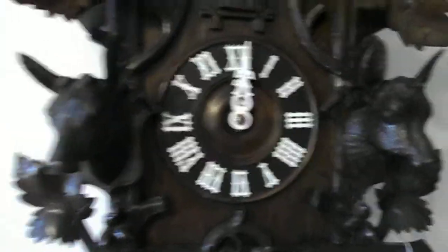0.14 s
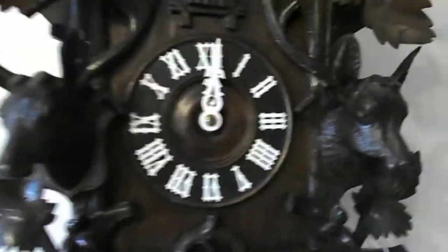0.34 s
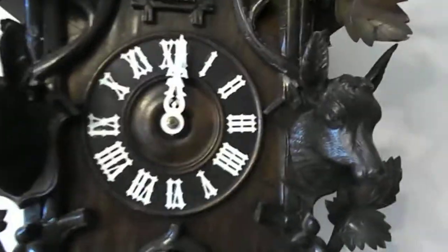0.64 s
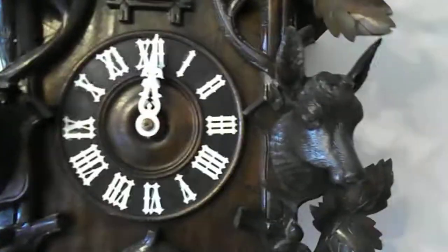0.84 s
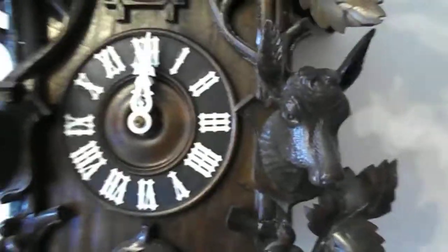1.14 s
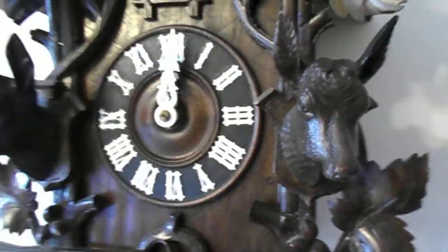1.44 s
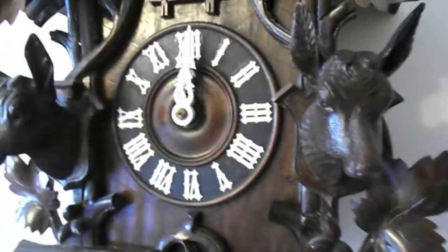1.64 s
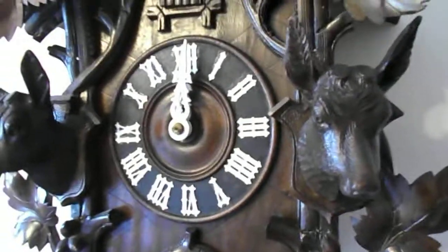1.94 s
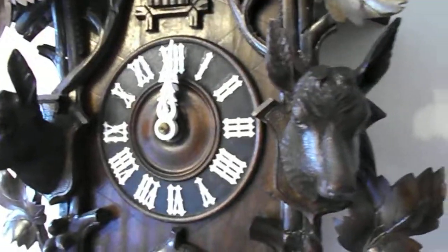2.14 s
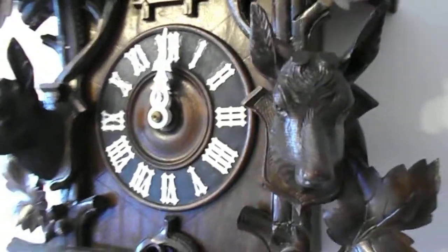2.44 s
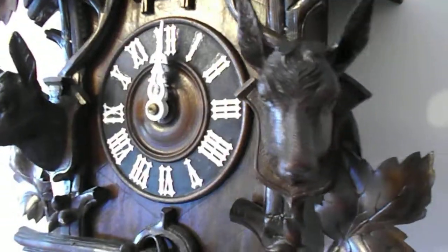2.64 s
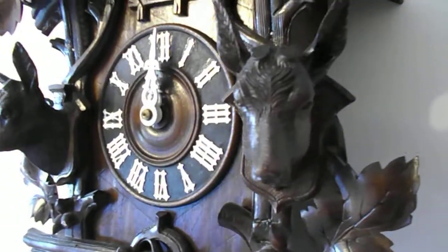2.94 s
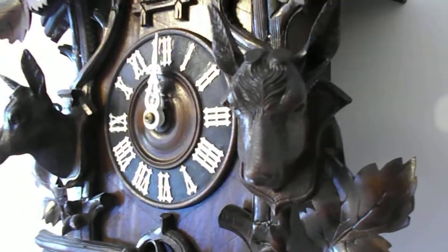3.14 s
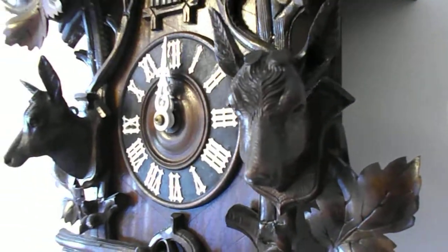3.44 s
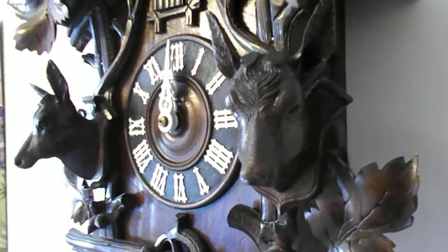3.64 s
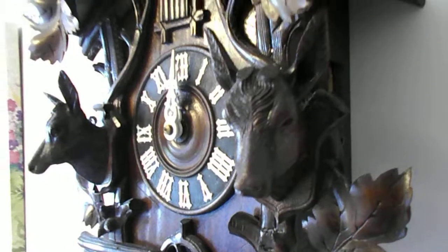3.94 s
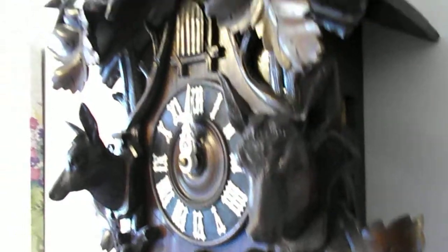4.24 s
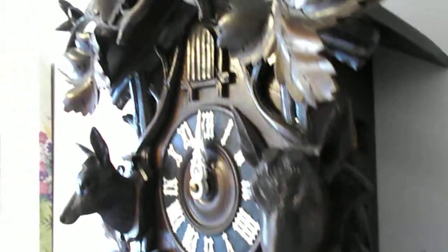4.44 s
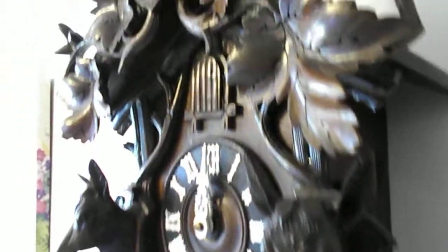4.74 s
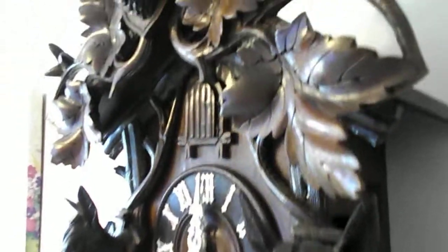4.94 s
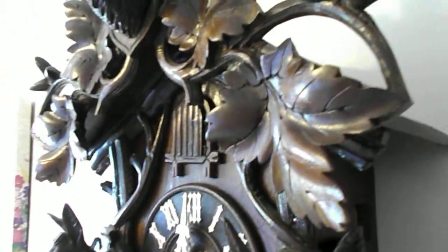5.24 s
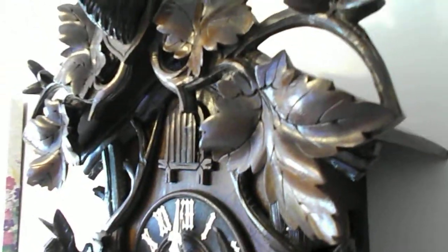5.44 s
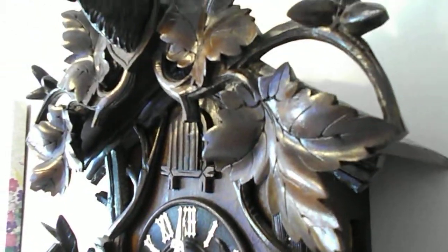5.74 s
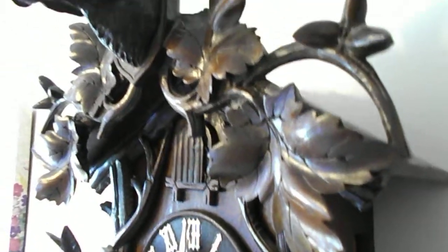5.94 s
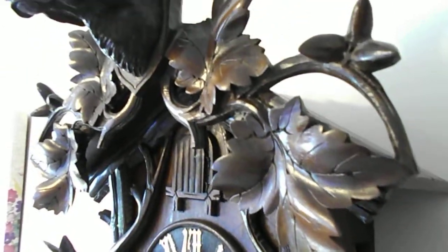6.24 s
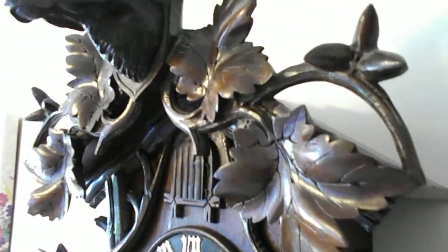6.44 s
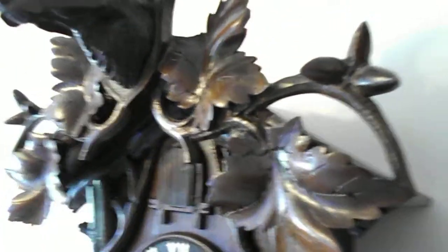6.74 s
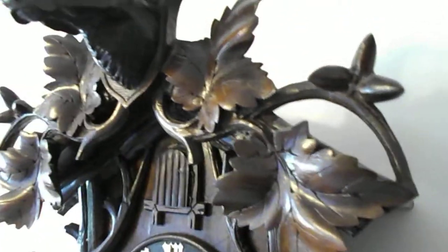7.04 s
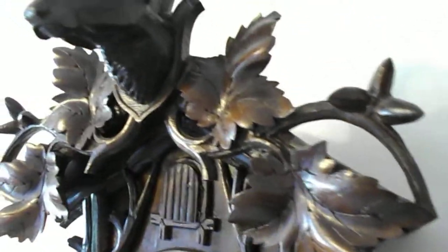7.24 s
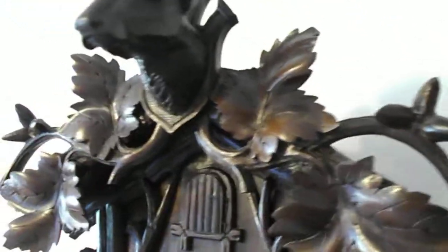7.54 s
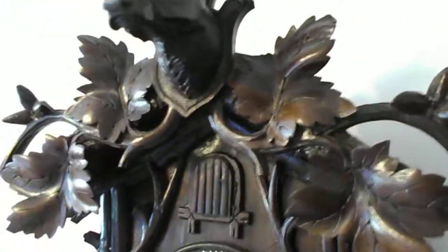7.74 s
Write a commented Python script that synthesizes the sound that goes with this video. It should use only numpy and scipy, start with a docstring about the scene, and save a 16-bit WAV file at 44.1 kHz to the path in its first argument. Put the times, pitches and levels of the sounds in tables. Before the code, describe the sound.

An old wooden wall clock ticks steadily, tick and tock alternating, while a hand-held microphone rustles, creaks and clicks in a quiet room.

```python
"""Wall clock in a small room

A carved wooden wall clock ticks in a small quiet room, heard by a hand-held microphone that moves round it.
The escape wheel strikes two pallets in turn: clusters of impulses ring the damped modes of the case,
and small knocks follow some of the ticks. Shaped noise gives room hum, shuffling clothes and a thin hiss.
The grip creaks, drags and clicks, a faint tone swells once, a hollow tap sounds; a filter dulls the treble.
"""
import sys
import numpy as np
from scipy import signal
from scipy.fft import rfft, irfft
from scipy.io import wavfile

SR = 44100
rng = np.random.default_rng(int(sys.argv[2]) if len(sys.argv) > 2 else 0)


def undo_db(level):
    """Turn decibels back into plain size, where 20 dB means ten times bigger."""
    steps = np.asarray(level, float) / 20
    return 10 ** steps


def wav_record(signal):
    """Record a signal, one row per channel, as 16-bit PCM in the file named by sys.argv[1]."""
    frames = np.transpose(np.atleast_2d(signal))
    bounded = np.clip(frames, -1, 1)
    # unit amplitude maps onto the largest positive 16-bit level
    quanta = np.round(bounded * 32767).astype(np.int16)
    wavfile.write(sys.argv[1], SR, quanta)


N = 347067   # length [samples]


def butter(order, hz, kind, x):
    """Butterworth filtering: a maximally flat pass band."""
    return signal.sosfilt(signal.butter(order, hz, kind, fs=SR, output="sos"), x)


def at_hz(points, hz):
    """Logarithmic frequency scale: read a (frequency [Hz], value) table along it."""
    table_hz, values = np.array(points).T
    return np.interp(np.log(np.maximum(hz, 1)), np.log(table_hz), values)


def coloured(spectrum):
    """Spectral shaping: white noise weighted by a (frequency [Hz], level [dB]) table."""
    gain = undo_db(at_hz(spectrum, np.fft.rfftfreq(N, 1 / SR)))
    return irfft(rfft(rng.standard_normal(N)) * gain, N)


def unit_band(x, low_hz, high_hz):
    """Band level: scale x to an rms of 1 between two frequencies."""
    return x / np.std(butter(4, [low_hz, high_hz], "band", x))


def waver(per_s):
    """Slow random modulation: straight lines between normal draws of spread 1."""
    steps = rng.standard_normal(1000)
    return np.interp(np.arange(N) / SR * per_s, np.arange(len(steps)), steps)


PATCHY_DB, PATCHES_PER_S = 1.5, 25   # spread and rate of the flicker


def patchy(x):
    """Independent band modulation: cloth is uneven, so four bands flicker apart."""
    spectrum = rfft(x)
    band = np.searchsorted([900, 1800, 3600], np.fft.rfftfreq(N, 1 / SR))
    return sum(undo_db(PATCHY_DB * waver(PATCHES_PER_S)) * irfft(spectrum * (band == k), N) for k in range(4))


FILTER_START_HZ = 4740
# zeros of the treble response [Hz]
FILTER_NULLS_HZ = [6990, 8510, 9995, 12000]
# height of the lobes between neighbouring zeros, before the top falls [dB]
FILTER_LOBES_DB = [-24, -20.5, -13.5]
TOP_FALL_HZ, TOP_FALL_DB_PER_KHZ = 10950, 17


def treble_filter(x):
    """Short symmetric low-pass: a slope down to the first null, then small lobes of alternating sign."""
    hz = np.fft.rfftfreq(N, 1 / SR)
    first_null = FILTER_NULLS_HZ[0]
    slope = np.clip((first_null - hz) / (first_null - FILTER_START_HZ), 0, 1)
    gain = np.sin(np.pi / 2 * slope) ** 1.59
    for k, (low, high, db) in enumerate(zip(FILTER_NULLS_HZ, FILTER_NULLS_HZ[1:], FILTER_LOBES_DB)):
        lobe = np.sin(np.pi * np.clip((hz - low) / (high - low), 0, 1))
        gain -= (-1) ** k * undo_db(db) * lobe
    gain *= undo_db(-TOP_FALL_DB_PER_KHZ * np.maximum(hz - TOP_FALL_HZ, 0) / 1000)
    return irfft(rfft(x) * gain, N)


# slow background level, high while the holder moves about:
# (time [s], hum level [dB], shuffle level [dB], thin hiss level [dB])
BACKGROUND = [(0.0, -63, -61, -78.5), (0.2, -62.5, -63.5, -80), (0.45, -53, -55, -71), (0.7, -62, -56, -76),
              (1.0, -63.5, -62, -78.5), (1.6, -65, -62.5, -78), (2.3, -64, -63.5, -79.5),
              (2.8, -63, -65.5, -84), (3.2, -68.5, -69.5, -84), (4.0, -63.5, -65, -86),
              (4.7, -67.5, -68, -86.5), (5.3, -64.5, -69, -89), (5.85, -66.5, -68.5, -87),
              (6.4, -66, -70, -89.5), (6.95, -63.5, -66.5, -86), (7.199, -64.5, -65, -85),
              (7.87, -63, -66, -79)]
# single sweeps of cloth on top: (middle [s], half length [s], shuffle level [dB], thin hiss level [dB])
SWEEPS = [(0.284, 0.15, -50.5, -75.5), (0.871, 0.082, -53, -76), (0.934, 0.099, -59, -88),
          (1.145, 0.14, -65, -69.5), (1.4, 0.15, -56, -74.5), (1.714, 0.27, -58.5, -76),
          (1.937, 0.16, -56, -72.5), (2.13, .09, -64.5, -79), (2.523, .28, -67, -74),
          (3.026, 0.17, -69.5, -81.5), (3.95, 0.37, -61.5, -85), (7.152, 0.096, -62, -78),
          (7.352, 0.15, -57, -81), (7.464, 0.074, -63, -81), (7.794, 0.15, -61, -91)]
# noise spectra, shape only: (frequency [Hz], relative level [dB])
HUM_SPECTRUM = [(25, -25), (60, -15.5), (100, -8.5), (150, -5.5), (180, -4), (215, -5), (300, -4.5),
                (345, -3.5), (420, -7.5), (800, -11), (1300, -16.5), (3000, -37)]
SHUFFLE_SPECTRUM = [(150, -36.5), (400, -4.5), (750, -1), (1400, -4), (2300, -4.5), (4600, -6), (6500, -13),
                    (8000, -25), (12000, -26)]
HISS_SPECTRUM = [(4000, -31), (6500, -9), (7300, -2), (9000, -7), (12000, -10)]
SWEEP_HUM_DB = -9.5   # low end of a sweep against its shuffle
WAVER_DB, WAVER_PER_S = 1.04, 5.4


def air():
    """Addition of powers: hum, shuffle and hiss are independent noises; sweeps are raised cosines squared."""
    t = np.arange(N) / SR
    s, *levels = np.transpose(BACKGROUND)
    levels_db = [np.interp(t, s, level) + WAVER_DB * waver(WAVER_PER_S) for level in levels]
    power = undo_db(2 * np.array(levels_db))
    for middle, half_length, shuffle_db, hiss_db in SWEEPS:
        swell = np.cos(np.pi / 2 * np.clip((t - middle) / half_length, -1, 1)) ** 4
        sweep_db = np.array([[shuffle_db + SWEEP_HUM_DB], [shuffle_db], [hiss_db]])
        power += undo_db(2 * sweep_db) * swell
    hum = unit_band(coloured(HUM_SPECTRUM), 60, 600)
    shuffle = unit_band(patchy(coloured(SHUFFLE_SPECTRUM)), 1200, 6000)
    # the hiss level holds behind the treble filter
    hiss = unit_band(treble_filter(coloured(HISS_SPECTRUM)), 7200, 11600)
    hum_gain, shuffle_gain, hiss_gain = np.sqrt(power)
    return hum_gain * hum + shuffle_gain * shuffle, hiss_gain * hiss


def ring(clicks, hz, t60):
    """Damped resonator: a unit click sets a decaying sine of initial height 1 ringing."""
    r, w = undo_db(-60 / (t60 * SR)), 2 * np.pi * hz / SR
    return signal.lfilter([0, np.sin(w)], [1, -2 * r * np.cos(w), r * r], clicks + 1e-18)


def add(out, s, sound):
    """Superposition: mix a sound in at time s."""
    i = round(s * SR)
    out[i:i + len(sound)] += sound[:N - i]


# diffuse decay: (frequency [Hz], level against the strike [dB], t60 [s])
ROOM = [(254, -32, 0.46), (435, -28, 0.31), (755, -21, 0.26), (1150, -17.5, 0.25), (1570, -21.5, 0.29),
        (2600, -20, 0.23), (3900, -20, 0.3), (5200, -22, 0.27), (7940, -30, 0.26)]


def room(size):
    """Diffuse reverberation, new each time as the microphone moves: noise bands that build up and die."""
    t = np.arange(size) / SR
    edges = 180 * 2 ** np.arange(0, 6.1, 1 / 3)   # third octaves [Hz]
    hz, level_db, t60 = np.transpose(ROOM)
    white = rng.standard_normal((2, size))
    tail = 0
    for k, (low, high) in enumerate(zip(edges, edges[1:])):
        band = butter(2, [low, high], "band", white[k % 2])
        centre = np.sqrt(low * high)
        fall_db = -60 * t / at_hz(np.c_[hz, t60], centre)
        tail = tail + band / np.std(band) * undo_db(at_hz(np.c_[hz, level_db], centre) + fall_db)
    return tail * np.clip((t - .003) / 0.0022, 0, 1)


# upper edges of the bass, middle, bright and treble registers [Hz]; the top register lies above
REGISTER_EDGES_HZ = [1100, 2750, 3750, 4950]
# modes of case and works, levels relative within a register, t60 before the damping factors:
# (frequency [Hz], tick level [dB], tock level [dB], knock level [dB], t60 [s])
CASE_MODES = [(241, -28.5, -50, -29, 0.17), (336.6, -28, -28.5, -39, 0.16), (371.6, -33.5, -23, -27, 0.19),
              (432, -33.5, -26, -26, 0.49), (613.4, -21.5, -17, -12.5, 0.058),
              (751.6, -6, -7.5, -10, 0.057), (888, -17, -14, -26, 0.082), (997, -12, -16.5, -21, 0.056),
              (1188, -18.5, -16.5, -21, 0.038), (1415, 2, -1, -14, 0.037), (1521, -5, -4.5, -1, 0.049),
              (1649, -1, -4.5, -5, 0.054), (1826, -10, -8.5, -9, 0.052), (1920, -14, -20, -24, 0.088),
              (2105, -3.5, -37, -26, 0.035), (2392, -27, -7, 1, 0.024), (2657, -9, -10.5, -6, 0.028),
              (2783, -3, -2.5, -2, 0.026), (3470, -62, -18, -7, 0.013), (3338, -2, -3.5, -10, 0.06),
              (3565, 14, 9.5, -10, 0.021), (3910, 1, 3, -9, 0.013), (4095, 2.5, -6.5, -17, 0.012),
              (4360, 4, -15.5, -27, 0.022), (4685, -9, -16.5, -4, 0.02), (5030, -30, 4, -15, 0.015),
              (5420, -5, -1, -23, 0.021), (6280, -42, -10, -14, 0.03)]
# contacts around each strike, the tooth slips off, lands, chatters, rebounds: (mean time [ms], level [dB])
CONTACTS = [(2, -19), (-0.47, -13.5), (.5, 1.5), (1.5, -4.5), (2.5, -13.5), (3.998, -3)]
REBOUND_MS = 6.1   # one more contact, its level set by the caller
CASE_IN_ROOM_DB = -18.5


def works(rows, kinds, spread_db, rattle_db, rattle_t60, damping, bass_damping):
    """Modal superposition: a cluster of contacts rings all modes of the case, with strengths of its own."""
    out = np.zeros(N)
    lead, size, front = .006, SR // 2, round(.024 * SR)   # [s], [samples], [samples]
    hz, *kind_db, t60 = np.transpose(CASE_MODES)
    after = np.arange(size) / SR - lead
    # the metal starts in phase: a sharp front
    signs = np.where(hz > 3000, 1, (-1) ** np.arange(len(hz)))
    register = np.searchsorted(REGISTER_EDGES_HZ, hz)
    damped_t60 = t60 / np.where(register > 0, damping, bass_damping)
    for (s, *register_db, rebound_db), kind in zip(rows, kinds):
        clicks = np.zeros(size)
        for ms, db in CONTACTS + [(REBOUND_MS, rebound_db)]:
            at = lead + ms * (1 + rng.normal(0, .04)) / 1000
            clicks[round(at * SR)] += undo_db(db)
        gains = signs * undo_db(kind_db[kind] + rng.normal(0, spread_db, len(hz)))
        rings = np.array([ring(clicks, f, decay) for f, decay in zip(hz, damped_t60)])
        # however the contacts fall, a mode takes up the energy that its strength and decay give it
        rings *= (gains * np.sqrt(t60 / np.sum(rings ** 2, axis=1)))[:, None]
        sound = np.zeros(size)
        for k, db in enumerate(register_db):
            group = rings[register == k].sum(axis=0)
            front_rms = np.sqrt(np.sum(group[:front] ** 2) / (.02 * SR))
            sound += undo_db(db) * group / front_rms
        strength = np.sqrt(np.sum(undo_db(np.array(register_db)) ** 2))
        # wheels and pivots rattle in their play: too many small modes to tell apart, brighter than the wood
        rattle_envelope = (after > 0) * undo_db(rattle_db - 60 * np.abs(after) / rattle_t60)
        rattle = rng.standard_normal(size) * rattle_envelope
        sound += strength * butter(2, 5200, "high", rattle)
        tail = room(size)
        # the walls also return the modes of the case, which draws them out in the tail
        unit_tail = tail / np.sqrt(np.sum(tail ** 2))
        sound += undo_db(CASE_IN_ROOM_DB) * signal.fftconvolve(sound, unit_tail)[:size]
        add(out, s - lead, sound)
        add(out, s, strength * tail)
    return out


# tick and tock in turn, rms of the modes over 20 ms towards the listening angle, ahead of the filters:
# (time [s], middle level [dB], bright level [dB], treble level [dB], top level [dB])
BEATS = [(0.128, -39, -38.5, -36.5, -42.5), (0.6197, -44, -37, -37, -44), (1.1953, -36, -59, -31.5, -52),
         (1.6831, -42.5, -38.5, -34, -48), (2.2618, -33.5, -42.5, -32.5, -58),
         (2.7527, -39, -34.5, -38, -45), (3.3249, -32, -36, -42, -45), (3.817, -38, -33.5, -42, -40.5),
         (4.39, -35, -36, -38, -43.5), (4.8827, -37, -32.5, -45, -42.5), (5.4527, -35, -41, -37.5, -56),
         (5.9493, -37.5, -32.5, -39, -43.5), (6.5185, -35.5, -39.5, -38, -47),
         (7.0124, -41, -35, -39, -42.5), (7.5835, -35.5, -46.5, -34.5, -43)]
# the bass spreads evenly all round, so it depends on the pallet alone;
# tick, then tock: (bass level [dB], rebound level [dB])
PALLETS = [(-42, -3), (-39, -13.5)]


def escapement():
    """Alternating impact excitation: the escape wheel strikes two pallets in turn."""
    pallet = np.arange(len(BEATS)) % 2
    rows = []
    for (s, *levels_db), k in zip(BEATS, pallet):
        bass_db, rebound_db = PALLETS[k]
        rows.append((s, bass_db, *levels_db, rebound_db))
    return works(rows, pallet, spread_db=3.5, rattle_db=-3.5, rattle_t60=0.049,
                 damping=1.0, bass_damping=0.88)


# the hand judders on the shell: a run of nearly even slips, uneven in strength, weakening on the whole
JUDDER_S, SLIP_GAP_S = 0.4, 0.0168
SLIP_DB, SLIP_FADE_DB, SLIP_HZ = -37.5, -0.9, 229   # mean first level, mean change per slip, mean pitch
# then one lone jerk: (time [s], level of the low ring [dB], frequency [Hz])
LONE_JERK = (2.747, -35, 252)
CREAK_CUT_HZ = 150   # the creak thins out below this


def creak():
    """Stick-slip friction: each jerk of the hand gives a dull low ring and a rough scuff above it."""
    out, click = np.zeros(N), np.eye(1, SR // 8)[0]
    t = np.arange(len(click)) / SR
    jerks = []
    for k, (time_draw, level_draw, pitch_draw) in enumerate(rng.standard_normal((7, 3))):
        s = JUDDER_S + SLIP_GAP_S * k + 0.00098 * time_draw
        db = SLIP_DB + SLIP_FADE_DB * k + 2.2 * level_draw
        jerks.append((s, db, SLIP_HZ * (1 + .12 * pitch_draw)))
    for s, db, hz in jerks + [LONE_JERK]:
        scuff = butter(1, [450, 1500], "band", rng.standard_normal(len(click)))
        scuff = scuff * undo_db(-2.5 - 60 * t / 0.073)
        low_ring = ring(click, hz, 0.073) + undo_db(-11.5) * ring(click, 142, 0.048)
        short_ring = undo_db(3.5) * ring(click, 810, 0.011)
        add(out, s, undo_db(db) * (low_ring - short_ring + scuff))
    return butter(3, CREAK_CUT_HZ, "high", out)


# the hand drags on the shell:
# (start [s], end [s], level [dB], low edge [Hz], high edge [Hz], swing of the lumps either way [dB])
DRAG = (0.45, 0.57, -53.5, 92, 302, 3)


def drag():
    """Amplitude-modulated friction noise: a low rumble sets in at once, throbs with the slips and fades."""
    start, end, db, low_hz, high_hz, lumps_db = DRAG
    t = np.arange(N) / SR
    noise = butter(2, [low_hz, high_hz], "band", rng.standard_normal(N))
    gate = np.clip((t - start) / 0.011, 0, 1) * np.clip((end - t) / .03, 0, 1)
    throb_db = lumps_db * np.sin(2 * np.pi * (t - JUDDER_S) / SLIP_GAP_S)
    return undo_db(db + throb_db) * gate * noise / np.std(noise)


# clicks of the shell, levels ahead of their filters:
# (time [s], click level [dB], buzz level against the click [dB])
GRIP_CLICKS = [(2.044, -21, -26), (5.8414, -27, -29), (6.3797, -13.5, -25.5), (6.449, -30.5, -19),
               (6.489, -14, -26), (6.6853, -29, -17), (6.7543, -15, -26), (6.9642, -17, -25),
               (7.142, -19, -26), (7.4573, -17, -22)]


def grip():
    """Impulse and decaying noise: the plastic shell gives a sharp thin spike and a short dull buzz behind it."""
    out, size = np.zeros(N), SR // 50
    t = np.arange(size) / SR
    impulse = np.eye(1, size)[0]
    spike = butter(2, 6800, "high", butter(2, 6800, "high", impulse))
    for s, db, buzz_db in GRIP_CLICKS:
        buzz = butter(1, [1500, 4800], "band", rng.standard_normal(size))
        buzz = buzz * undo_db(buzz_db - 60 * t / 0.012)
        add(out, s, undo_db(db) * (spike + buzz))
    return out


# lighter knocks in the works, rms of the modes over 20 ms, ahead of the filters:
# (time [s], bass level [dB], middle level [dB], bright level [dB], treble level [dB])
KNOCKS = [(2.3945, -59, -58.5, -68, -74), (2.741, -64, -44, -53, -53), (3.455, -57.5, -54.5, -54, -69),
          (4.5157, -57, -52, -50, -66.5), (5.5774, -55.5, -48.5, -54, -64), (6.6448, -55.5, -52, -54, -78),
          (7.2452, -64, -52, -60, -76), (7.713, -58.5, -53, -59, -69)]
KNOCK_TOP_DB = -9   # top register of a knock against its treble
KNOCK_REBOUND_DB = -9.5


def knocks():
    """Mode-dependent damping: in light knocks the upper case modes die quickly, bass modes ring on longer."""
    rows = [(*row, row[-1] + KNOCK_TOP_DB, KNOCK_REBOUND_DB) for row in KNOCKS]
    return works(rows, [2] * len(rows), spread_db=3.0, rattle_db=-3, rattle_t60=0.023,
                 damping=3.4, bass_damping=0.4)


# one low tone: (start [s], end [s], frequency [Hz], peak level [dB])
FAINT_TONE = (4.5, 6, 350.5, -68)


def faint_tone():
    """Amplitude envelope: a low sine swells softly once along half a sine wave."""
    start, end, hz, db = FAINT_TONE
    t = np.arange(N) / SR
    swell = np.sin(np.pi * np.clip((t - start) / (end - start), 0, 1))
    return undo_db(db) * swell * np.sin(2 * np.pi * hz * t)


TAP_S = 6.7983
# modes of something hollow, levels ahead of the filters: (frequency [Hz], level [dB], t60 [s])
TAP_MODES = [(450, -55, 0.063), (1040, -39, 0.021), (1430, -37, 0.022), (2350, -47, 0.011),
             (2940, -43, 0.017), (3580, -41, .005), (4650, -37.5, .006), (9450, -28, 0.0022)]


def tap():
    """Impulse response: a single clean contact rings a few short modes."""
    click = np.eye(1, N, round(TAP_S * SR))[0]
    return sum(undo_db(db) * ring(click, hz, t60) for hz, db, t60 in TAP_MODES)


BASS_CUT_HZ = 250


def scene():
    """Superposition: clock in its room, hand noises at the microphone and background, dulled by one filter."""
    background, hiss = air()
    blows = escapement() + knocks() + grip() + tap()
    blows = butter(2, BASS_CUT_HZ, "high", blows)   # small bodies radiate no deep bass
    mix = blows + background + creak() + drag() + faint_tone()
    return (treble_filter(mix) + hiss)[None]


def band_limit(x):
    """A steep low-pass at the top of the band."""
    return signal.sosfilt(signal.butter(12, 11870, fs=SR, output="sos"), x)


def record(dry):
    """Signal chain: the finished mix goes to its last stage unchanged."""
    return band_limit(dry)


dry = scene()
out = record(dry)
wav_record(out)
```